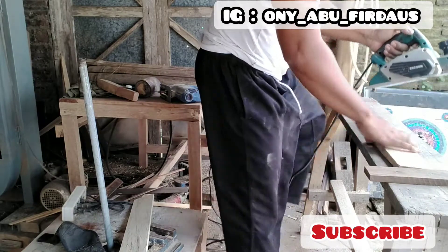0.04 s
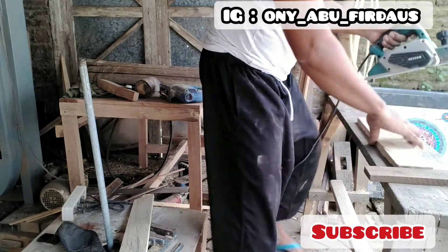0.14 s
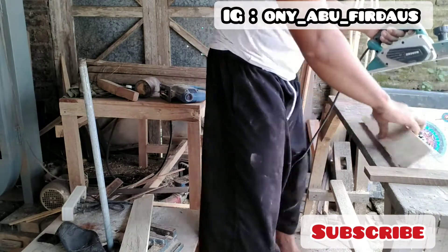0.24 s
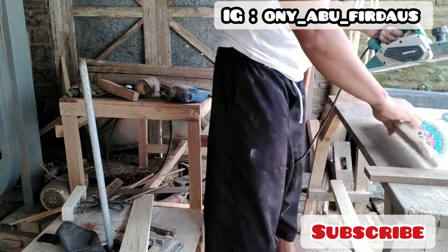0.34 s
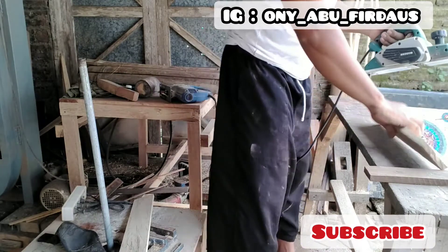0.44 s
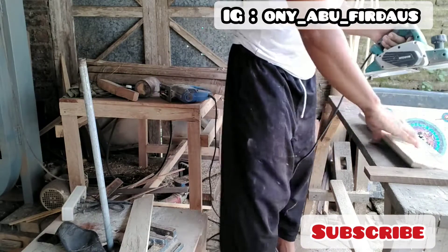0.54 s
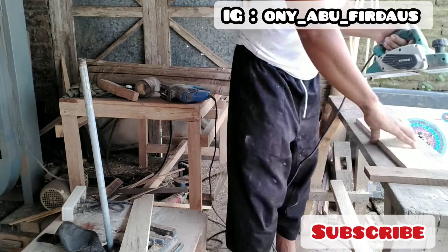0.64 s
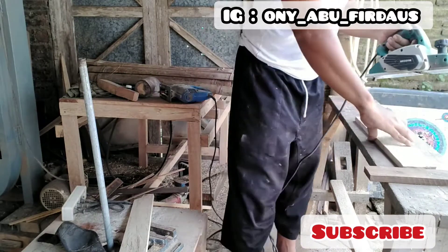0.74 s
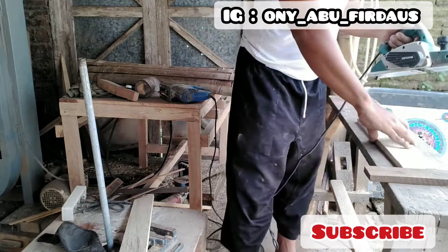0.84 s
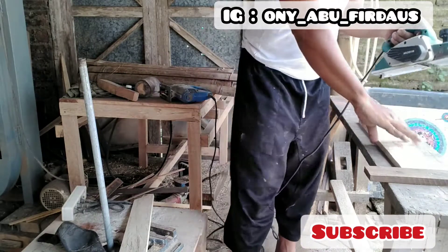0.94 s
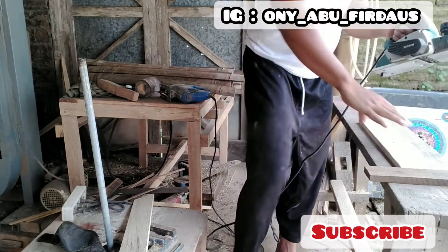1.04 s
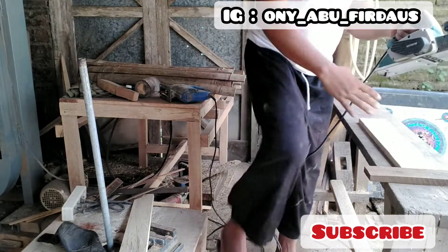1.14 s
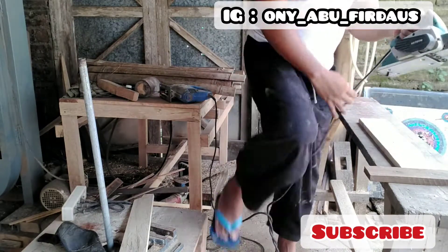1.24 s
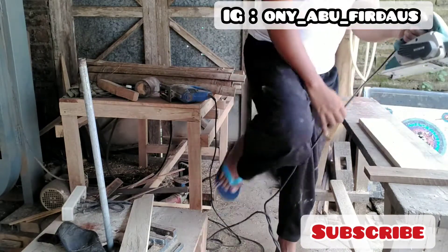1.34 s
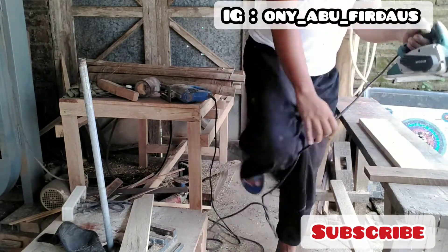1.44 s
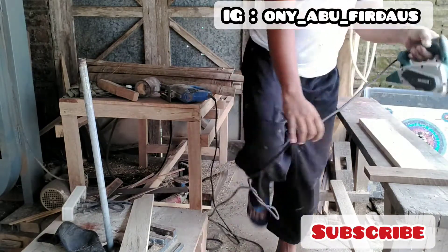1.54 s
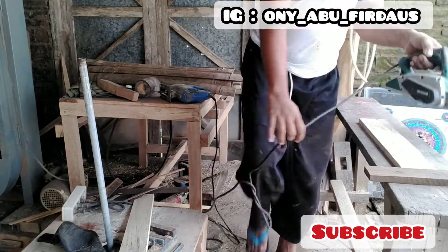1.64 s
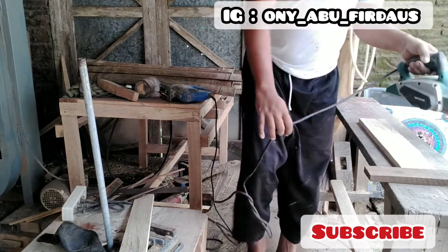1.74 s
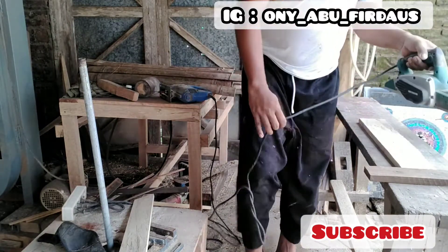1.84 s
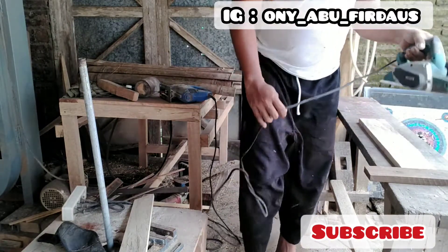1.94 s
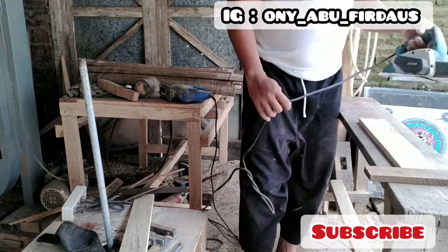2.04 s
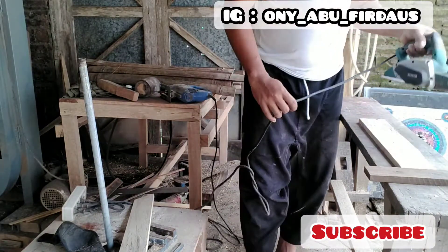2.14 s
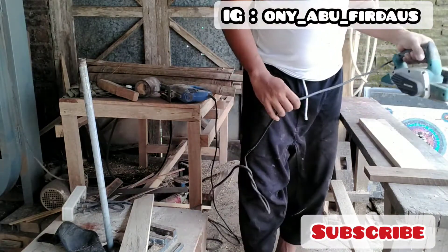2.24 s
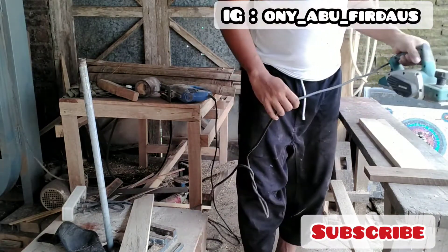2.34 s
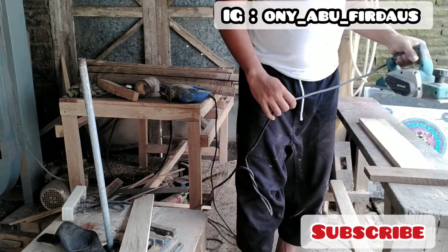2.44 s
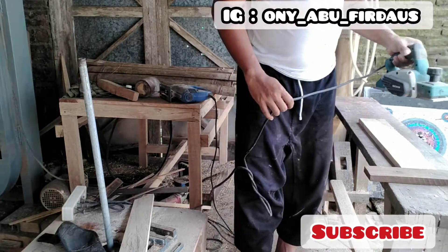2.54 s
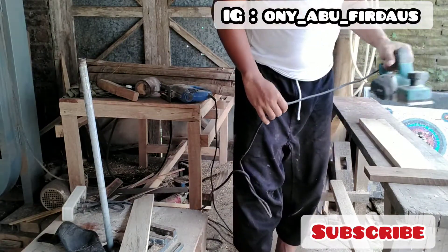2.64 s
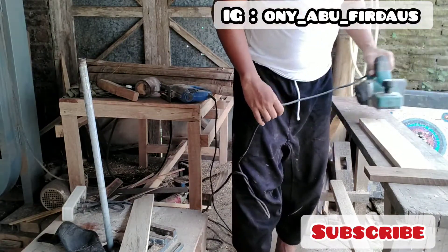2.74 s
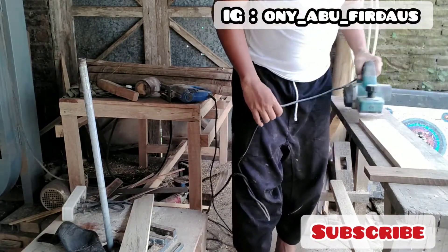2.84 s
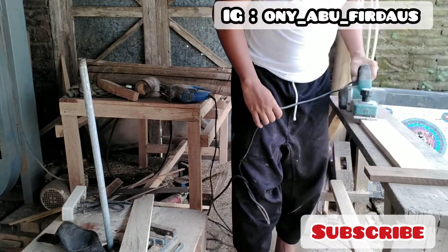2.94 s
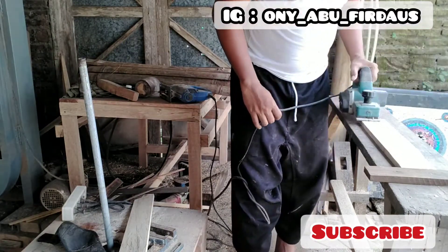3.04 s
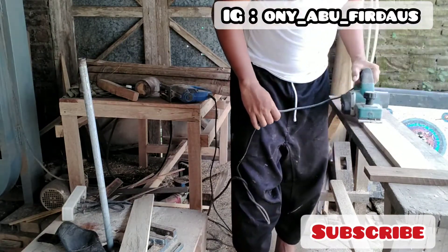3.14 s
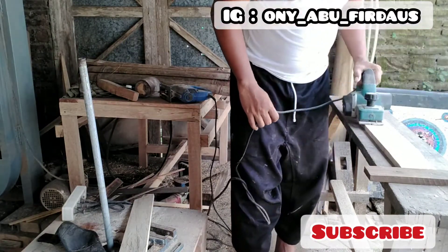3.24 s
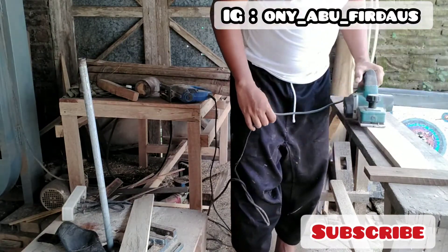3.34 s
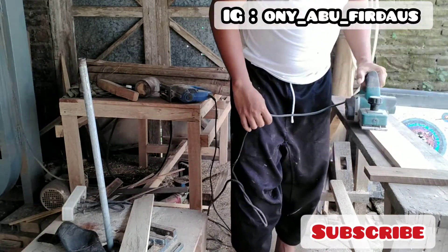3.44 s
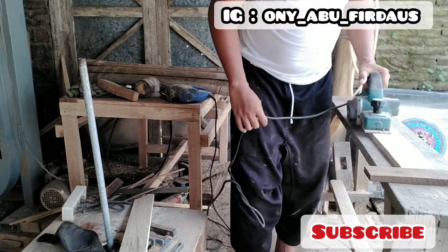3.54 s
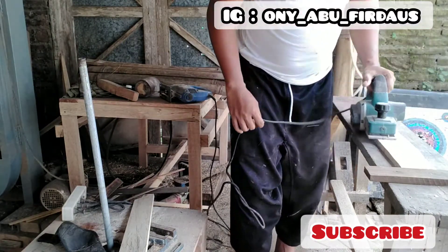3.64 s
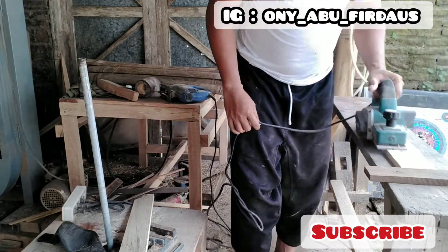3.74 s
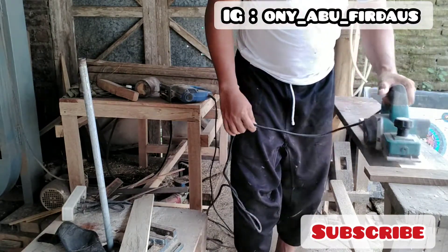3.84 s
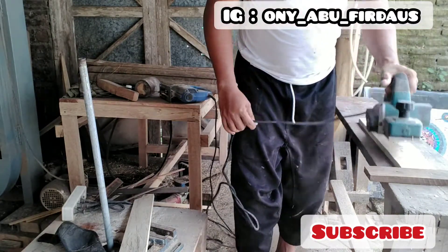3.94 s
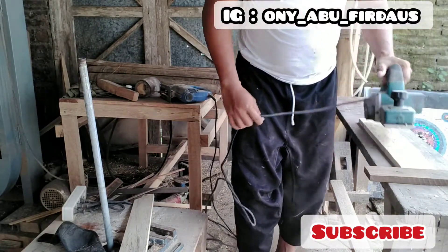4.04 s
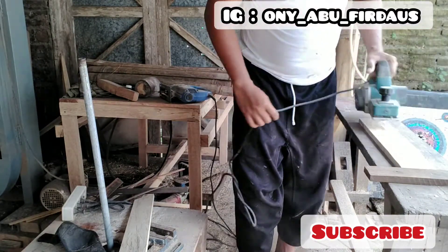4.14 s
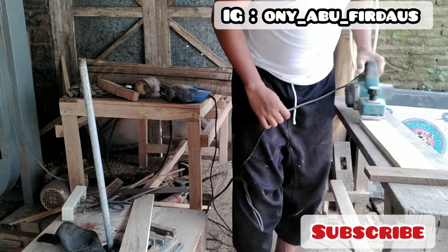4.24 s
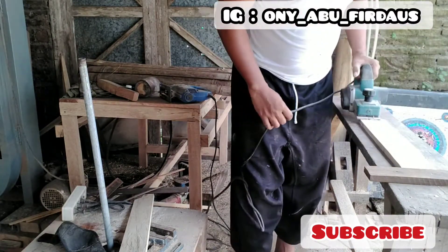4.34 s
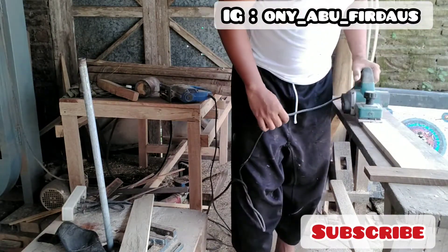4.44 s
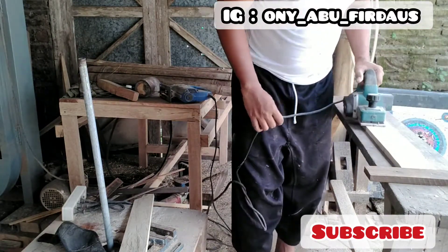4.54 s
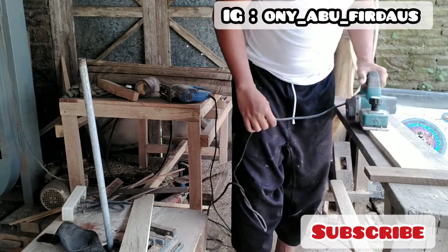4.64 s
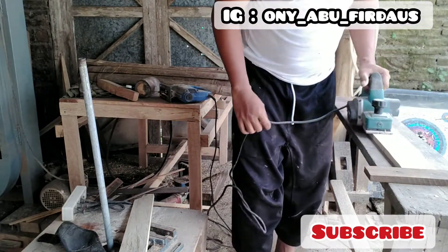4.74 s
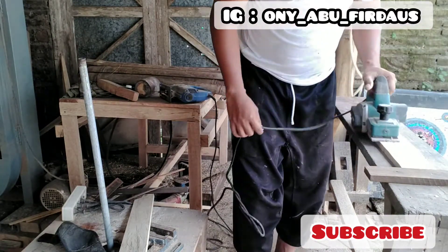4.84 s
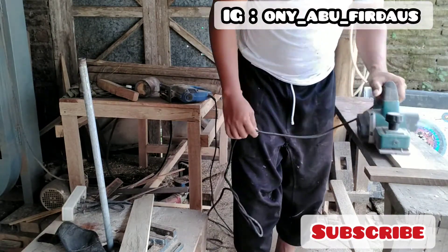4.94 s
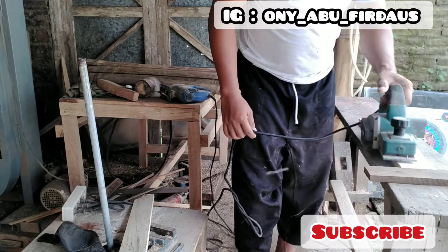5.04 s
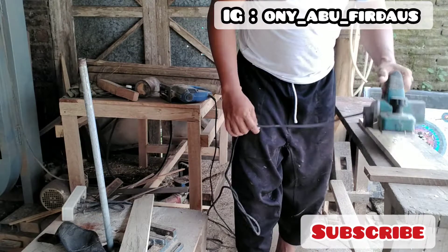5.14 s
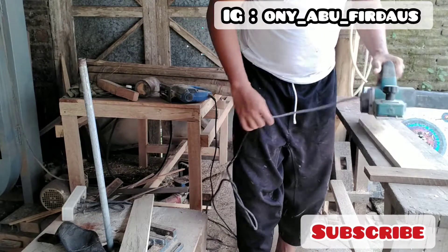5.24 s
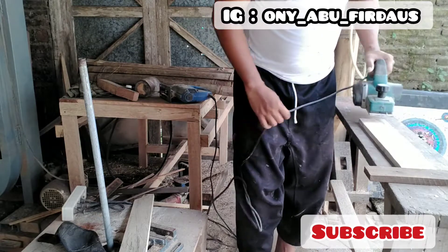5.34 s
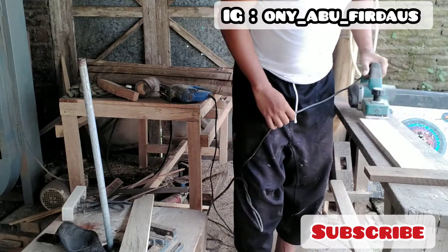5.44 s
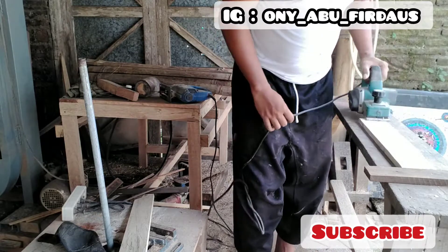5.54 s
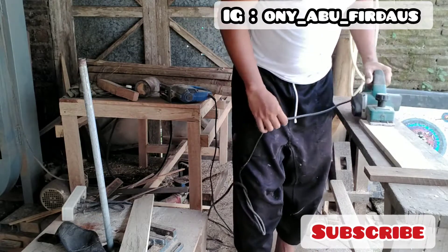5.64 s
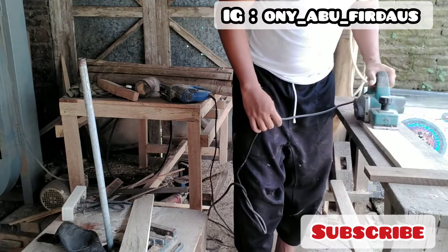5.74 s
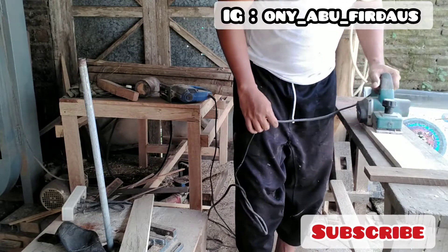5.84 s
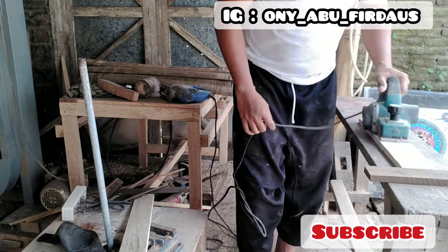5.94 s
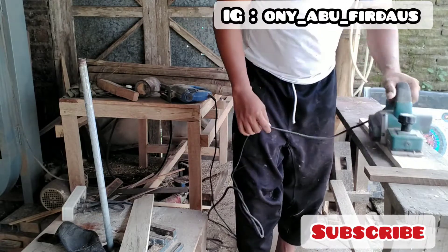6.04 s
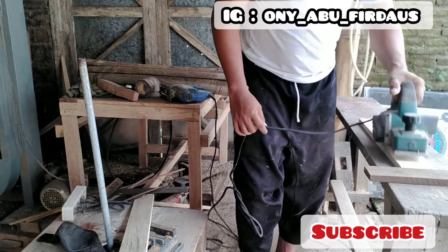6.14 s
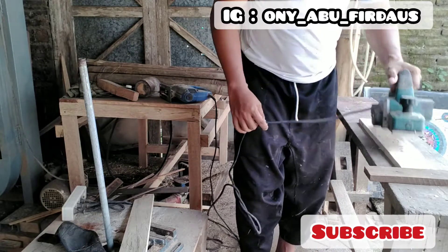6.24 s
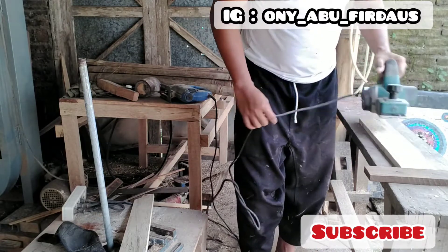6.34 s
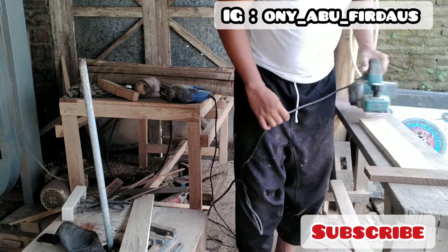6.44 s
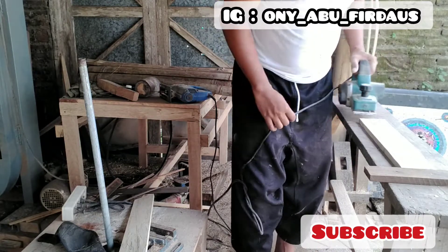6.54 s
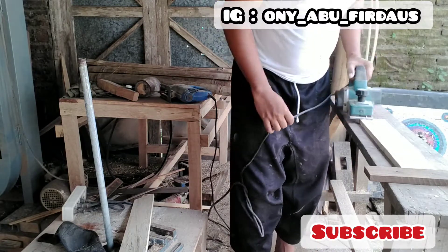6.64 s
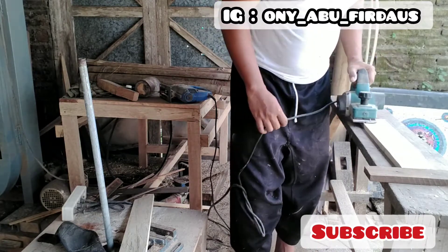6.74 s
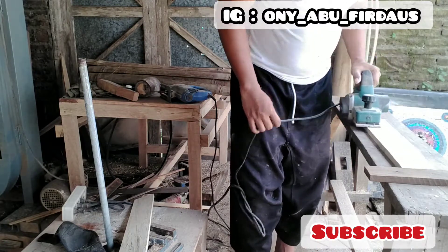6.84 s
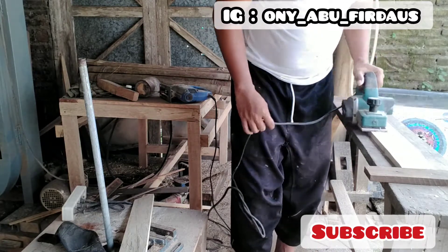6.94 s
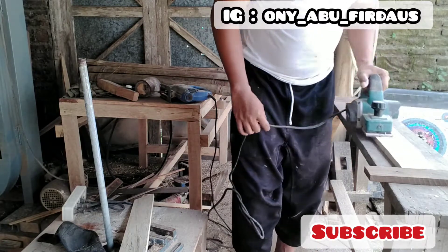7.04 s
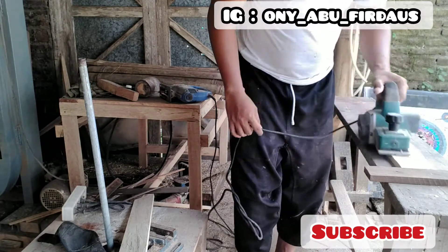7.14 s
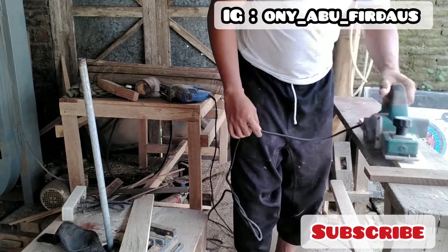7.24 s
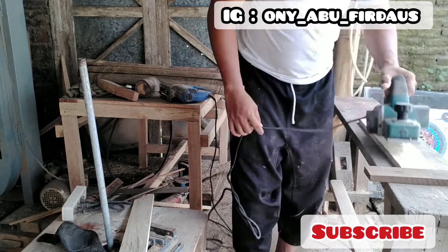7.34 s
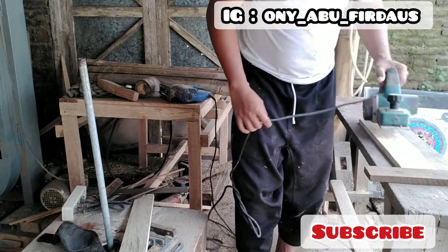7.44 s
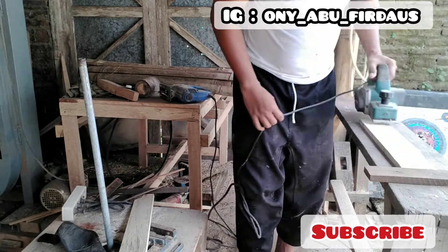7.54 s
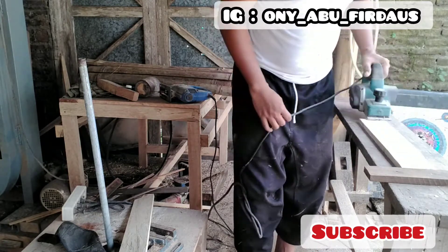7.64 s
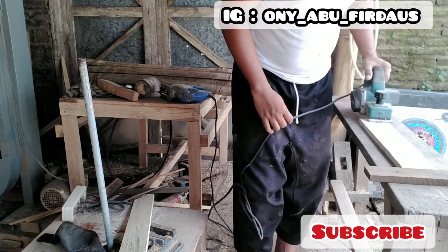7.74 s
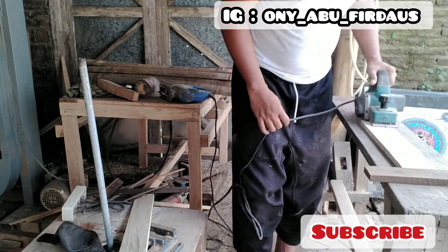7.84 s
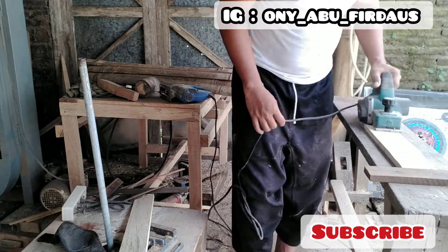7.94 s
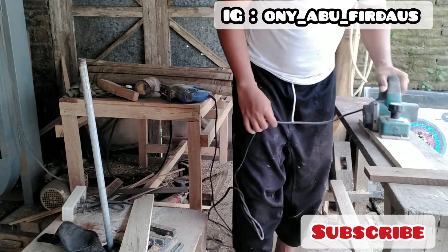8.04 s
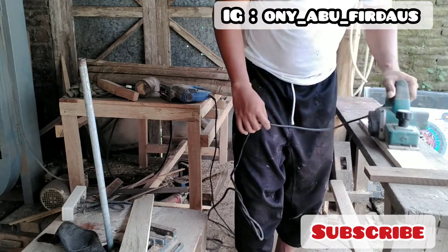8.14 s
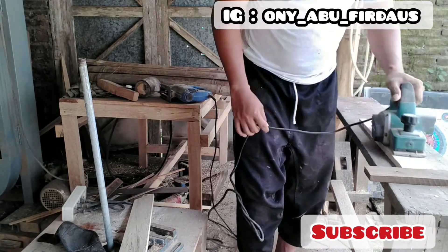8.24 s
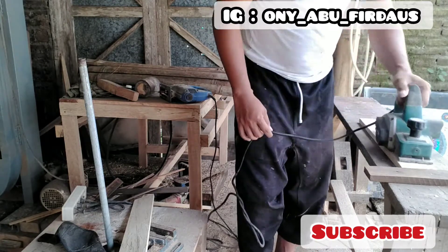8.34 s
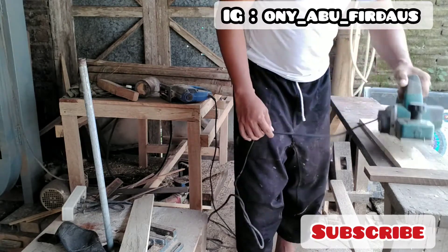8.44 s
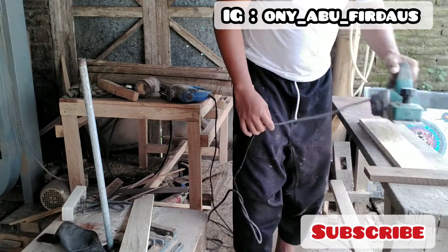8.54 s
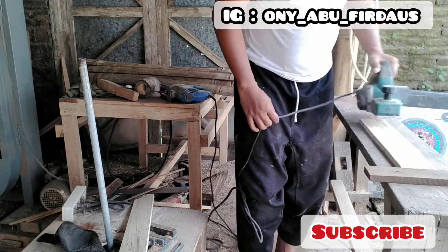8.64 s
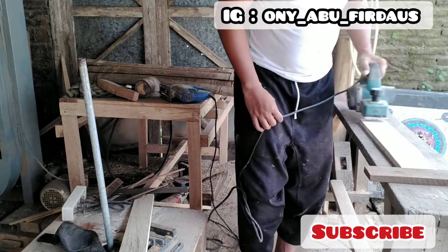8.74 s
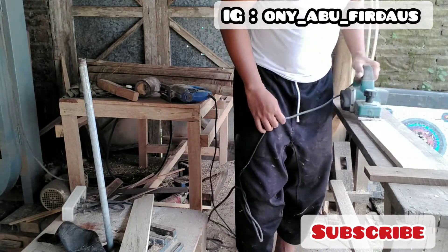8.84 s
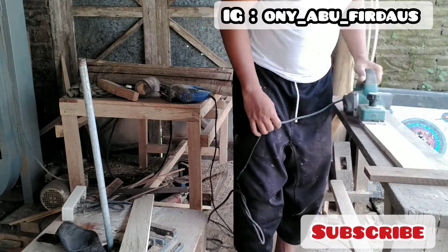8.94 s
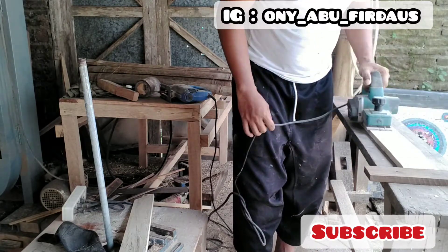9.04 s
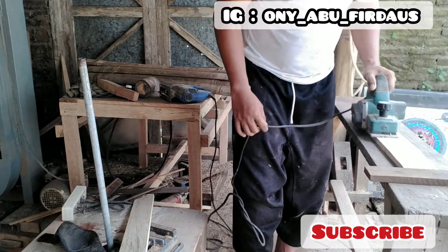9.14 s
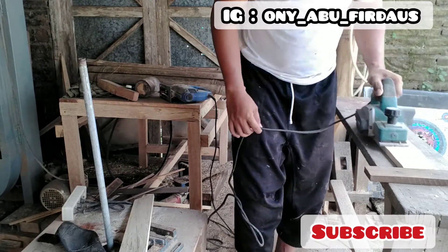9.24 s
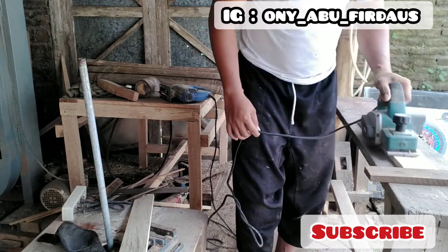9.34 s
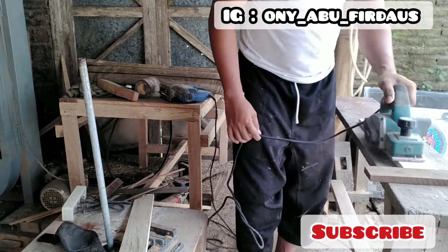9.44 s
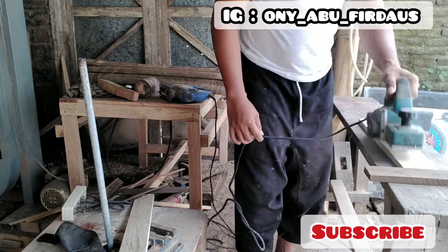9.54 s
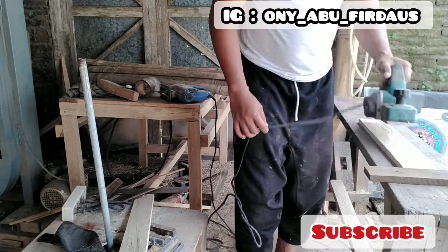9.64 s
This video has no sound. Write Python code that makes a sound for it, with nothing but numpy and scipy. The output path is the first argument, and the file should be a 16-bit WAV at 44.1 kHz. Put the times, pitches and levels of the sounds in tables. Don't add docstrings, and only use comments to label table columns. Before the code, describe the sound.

Wooden board knocks and slides on a bench, then an electric hand planer squeals, whines up and growls through six passes over the wood.

```python
import sys
import numpy as np
from scipy import signal
from scipy.fft import rfft, irfft, next_fast_len
from scipy.io import wavfile
from scipy.ndimage import uniform_filter1d, map_coordinates

SR = 44100
rng = np.random.default_rng(int(sys.argv[2]) if len(sys.argv) > 2 else 0)


def amplitude_ratio(level_db):
    exponent = np.asarray(level_db, float) / 20
    return 10 ** exponent


def wav_record(signal):
    frames = np.transpose(np.atleast_2d(signal))
    bounded = np.clip(frames, -1, 1)
    quanta = np.round(bounded * 32767).astype(np.int16)
    wavfile.write(sys.argv[1], SR, quanta)


N = 427769
TIME = np.arange(N) / SR

PULLEYS = 1.1185
FAN_VANES, ROTOR_SLOTS = 31, 12
ON_S, STEPS_HZ, GRIP_S = 2.305, 250, .03
CREEP_PCT, SLIP_LAG_S = .15, .035
START_SLIP_PCT, START_SLIP_S, START_SHAPE = 60, .105, 1.6
ATTACK_S, RELEASE_S, LINGER_S, SING_S = .008, .03, .029, .16
SHELL_DB, SHELL_GAP_DB, SHELL_GROWS = -23, -20, 2.8
CHUTE_DB, CHUTE_GAP_DB, CHUTE_GROWS = -23, -16, 1.3
FADE_DB = 1.4
WIND_PATCHY_DB = 1.2

# knife_rate_hz, speed_gain_hz_per_s
MOTOR_TORQUE = [(0, 1904), (250, 1150), (400, 469), (480, 251), (540, 131), (580, 75), (620, 37)]
# start_s, length_s, drum_drag_hz_per_s, belt_slip_pct
BITES = [(3.4, .119, 190, .7), (3.526, .101, 532, 1.6), (3.852, .06, 86, .3), (4.691, .153, 435, 1.9),
         (4.838, .036, 182, 4.8), (5.011, .057, 352, 1.9), (5.756, .19, 566, 4.6), (5.942, .032, 193, 4.7),
         (6.09, .074, 267, 1.5), (6.909, .102, 539, 3.1), (7.006, .139, 288, 3.2), (7.216, .054, 176, 1.4),
         (7.983, .122, 241, .7), (8.204, .093, 298, .9), (8.297, .133, 156, 1.4), (9.099, .104, 175, .7),
         (9.198, .274, 251, 1.8), (9.461, .09, 103, 1.4)]
# chop_db, board_rumble_db
BITE_LEVELS = [(-22.5, -37), (-22.5, -38.5), (-33, -58), (-24.5, -35.5), (-28, -44), (-27.5, -47),
               (-22, -34), (-27.5, -44), (-28, -45), (-22.5, -34), (-26.5, -38), (-27, -40), (-25, -44),
               (-25, -34.5), (-26, -41.5), (-26, -43), (-24.5, -38.5), (-30, -47)]
# knife_harmonic_3_db, knife_harmonic_4_db, knife_harmonic_5_db
BOARD_SINGING = [(-24.0, -26.9, -25.8), (-26.1, -24.5, -26.0), (-24.7, -31.3, -35.3), (-26.0, -22.8, -28.1),
                 (-27.7, -21.7, -24.9), (-24.6, -32.5, -31.0), (-41.1, -30.2, -30.4), (-37.2, -31.5, -30.3),
                 (-34.0, -32.1, -35.2), (-30.6, -27.5, -32.3), (-29.3, -28.5, -32.2), (-31.6, -29.2, -33.7),
                 (-25.1, -17.5, -23.0), (-23.7, -17.2, -24.7), (-23.3, -25.0, -31.7), (-23.8, -24.0, -18.6),
                 (-23.9, -29.5, -33.0), (-24.0, -31.1, -31.0)]
# order, level_db, change_in_wood_db
MOTOR_ORDERS = [(1, 1, -6), (2, 1, -4), (3, 0, -3), (4, 2, -6)]
# harmonic, change_in_wood_db
KNIFE_ORDERS = [(1, -3), (2, -2), (3, -12), (4, -2), (5, -3)]
# motor_order, drum_order, level_db
WEAK_LINES = [(0, 12, -40), (0, 14, -41), (0, 16, -45), (1.001, 1, -35.5), (1.993, -1, -39.5),
              (1.97, 1, -35), (3, -1, -35), (3.036, 1, -45), (3.97, 1, -37.5), (5, 0, -40), (6, 0, -72),
              (7.1, 0, -37), (24, 0, -66)]
# centre_hz, width_hz, level_db
SHELL_MODES = [(417, 24, 3.5), (486, 8, -1.3), (538, 29, -4.7), (806, 46, 2.3), (932, 69, 2.0),
               (997, 33, 3.6), (1069, 32, 2.3), (1457, 26, 5.3), (1506, 14, -0.8), (1605, 0, -0.1),
               (1956, 45, 5.8), (2057, 93, 1.0), (2136, 39, 0.0)]
# centre_hz, width_hz, level_db
CHUTE_MODES = [(420, 29, 3.2), (548, 19, -6.0), (590, 8, 2.1), (896, 74, 0.8), (1035, 60, -0.9),
               (1147, 62, -0.8), (1449, 96, 0.9), (1669, 78, -9.5), (1733, 47, -2.4), (2101, 62, -4.0),
               (2372, 112, -10.8), (2590, 77, -1.2), (2748, 30, -6.3)]
# freq_hz, level_db
WIND_SPECTRUM = [(40, -87), (180, -27), (400, -17), (600, -8), (1000, -5.5), (2200, -2.5), (3000, -10.5),
                 (4000, -16), (6000, -28), (7000, -28.5), (8700, -18.5), (10500, -28), (13000, -34),
                 (16000, -33)]
# freq_hz, level_db
CHOP_SPECTRUM = [(200, -7), (300, -4), (1000, -18), (2500, -1), (3400, -3.5), (4000, -5), (6090, -13.5),
                 (8950, -6), (10400, -20.5), (13000, -25), (16000, -27)]
# freq_hz, level_db
CHIP_SPECTRUM = [(500, -40), (2500, 4), (6000, -14.5), (8700, -16.5), (11000, -13), (16000, -44)]
# freq_hz, level_db
RUMBLE_SPECTRUM = [(30, -48), (70, -8), (120, 1.5), (300, 3.5), (600, 2.5), (1000, -57.5)]
# peak_s, level_db
THUMPS = [
    (2.325, -47),
    (3.417, -29),
    (4.759, -34),
    (5.777, -31),
    (6.949, -28),
    (9.239, -41),
]
# time_s, pitch_hz, level_db
SQUEAL = [
    (2.3, 8550, -73),
    (2.31, 8260, -21),
    (2.35, 6500, -21),
    (2.37, 5710, -19),
    (2.42, 5710, -20),
    (2.45, 6060, -22),
    (2.485, 6720, -25.5),
    (2.52, 6970, -37),
    (2.6, 7400, -77),
]
# centre_hz, width_hz, level_db
COVER_MODES = [(5740, 280, -3.5), (6710, 308, 5), (7840, 290, 4.5), (10500, 2400, -7)]
# start_s, peak_db, t60_s, knock_centre_hz
KNOCKS = [(.252, -46, .25, 3200), (0.502, -26, 0.081, 1180), (.521, -20, 0.18, 1170),
          (.535, -18, 0.21, 600), (.555, -22, 0.13, 500), (.585, -25.5, 0.41, 452), (.676, -32, 0.3, 600),
          (.712, -8, 0.18, 1390), (.745, -31, .2, 1300), (0.957, -17.5, 0.15, 1240),
          (.965, -16.5, 0.17, 1150), (.985, -36, 0.21, 1100), (2.09, -37, 0.18, 600),
          (2.312, -16.5, 0.16, 1280), (2.33, -18.5, 0.092, 2000)]
# freq_hz, level_db, t60_s
BOARD_MODES = [(570, -18.5, 0.23), (685, -1, 0.18), (840, -6.5, 0.4), (1490, 3, 0.23), (1580, -3.5, 0.85),
               (1820, -16, 0.25), (1860, 10, 0.12), (2160, -4, 0.18), (2390, -1.5, 0.12), (3413, -22, 0.35)]
# freq_hz, level_db
CLATTER_SPECTRUM = [(47, -51), (80, -10), (310, -10.5), (667, -9.5), (922, -6.5), (1470, -9.5), (3430, -18),
                    (5030, -34), (10000, -51), (13000, -71), (22000, -120)]
# peak_s, level_db, rise_s_per_20db, fall_s_per_20db
STROKES = [(.25, -54.5, .045, .13), (.384, -51, .17, .055), (.524, -54, .012, .11), (.72, -52, .07, .3),
           (.863, -45, .09, .065), (.958, -59, .02, .12), (1.15, -55, .045, .05), (1.98, -65, .05, .2),
           (2.14, -61.5, .4, .1)]
# freq_hz, level_db
GRIT_SPECTRUM = [(120, -40), (200, 1), (268, -17), (482, -10.5), (1370, -7.5), (1530, -10), (2420, -3),
                 (5420, -23.5), (8740, -16), (16000, -48)]
# centre_hz, width_hz, level_db
EDGE_MODES = [(2540, 97, -7), (3400, 180, -3), (4300, 250, -3)]
# freq_hz, level_db
AIR_SPECTRUM = [(18, -59), (30, -25), (145, -5), (161, -8), (684, -12), (740, -6.5), (962, -16.5),
                (1860, -18.5), (5310, -35), (8520, -35.5), (16000, -49)]
# freq_hz, level_db
FAR_HUM = [(339.1, -69), (737.5, -69.5)]


def planer():
    knife_hz, slip_pct = spin()
    motor_hz = knife_hz / PULLEYS * (1 + slip_pct / 100)
    drum_turns = np.cumsum(knife_hz / 2) / SR
    motor_turns = np.cumsum(motor_hz) / SR
    speed_db = 20 * np.log10(knife_hz / 570)
    chop_db, rumble_db = np.transpose(BITE_LEVELS)
    bite = in_wood(chop_db, RELEASE_S, LINGER_S)

    lines = orders(knife_hz, motor_hz, drum_turns, motor_turns, speed_db)
    lines += weak_lines(knife_hz, motor_hz, drum_turns, motor_turns, speed_db)
    lines += amplitude_ratio(-10) * shop(lines, t60_s=.25)
    running = lines + whistle(motor_turns, speed_db, bite) + wind(motor_turns, speed_db, bite)

    chatter_db = 1.7 * wobble(45)
    cut = amplitude_ratio(1.5 + chatter_db) * bite * cutting(drum_turns, slip_pct)
    return (TIME > ON_S) * running + cut + rumble(rumble_db)


def spin():
    t = np.arange(ON_S, N / SR + .01, 1 / STEPS_HZ)
    held = np.array([np.clip(np.minimum(t - s, s + length - t) / GRIP_S + .5, 0, 1)
                     for s, length, *_ in BITES])
    drag, load_slip_pct = np.transpose(BITES)[2:] @ held
    torque_at_hz, gain = np.transpose(MOTOR_TORQUE)
    hz = [20]
    for brake in drag[:-1]:
        hz.append(hz[-1] + (np.interp(hz[-1], torque_at_hz, gain) - brake) / STEPS_HZ)
    step = 1 / (STEPS_HZ * SLIP_LAG_S)
    slip_pct = CREEP_PCT + signal.lfilter([step], [1, step - 1], load_slip_pct)
    slip_pct += START_SLIP_PCT * np.exp(-((t - ON_S) / START_SLIP_S) ** START_SHAPE)
    return np.interp(TIME, t, hz), np.interp(TIME, t, slip_pct)


def in_wood(levels_db, release_s, linger_s):
    t, gain = TIME[::64], 0
    for (s, length, *_), db in zip(BITES, levels_db):
        attack = np.clip((t - s) / ATTACK_S + .5, 0, 1)
        release = np.exp(np.minimum(s + length + linger_s - t, 0) / release_s)
        gain = np.maximum(gain, amplitude_ratio(db) * attack * release)
    return np.interp(TIME, t, gain)


def housing_db(hz, modes, gap_db):
    grid_hz = np.arange(4000.)
    power = amplitude_ratio(gap_db) ** 2
    for c, w, db in modes:
        power = power + amplitude_ratio(db) ** 2 / (1 + (2 * (grid_hz - c) / max(w, 6)) ** 2)
    return np.interp(hz, grid_hz, 10 * np.log10(power))


def orders(knife_hz, motor_hz, drum_turns, motor_turns, speed_db):
    load = in_wood(np.zeros(len(BITES)), RELEASE_S, LINGER_S)
    lines = np.zeros(N)
    for k, db, wood_db in MOTOR_ORDERS:
        level_db = SHELL_DB + db + wood_db * load + SHELL_GROWS * speed_db
        level_db += FADE_DB / 2 * wobble(5) + housing_db(k * motor_hz, SHELL_MODES, SHELL_GAP_DB)
        lines += tone(k * motor_turns, level_db, shake_db=2.36)
    singing = [0, 0] + [in_wood(db + .5, SING_S, 0) for db in np.transpose(BOARD_SINGING)]
    for (k, wood_db), sing in zip(KNIFE_ORDERS, singing):
        free_db = CHUTE_DB + wood_db * load + CHUTE_GROWS * speed_db
        free_db += housing_db(k * knife_hz, CHUTE_MODES, CHUTE_GAP_DB)
        free = amplitude_ratio(free_db) * np.clip(knife_hz / 360, 0, 1) ** 4
        lines += (free + sing) * tone(2 * k * drum_turns, FADE_DB * wobble(5), shake_db=4.0)
    return lines


def weak_lines(knife_hz, motor_hz, drum_turns, motor_turns, speed_db):
    lines = np.zeros(N)
    for m, d, db in WEAK_LINES:
        m, d = round(m), round(d)
        chute_db = housing_db(m * motor_hz + d * knife_hz / 2, CHUTE_MODES, CHUTE_GAP_DB)
        level_db = db + 1 + .47 * chute_db + 2.6 * speed_db + 1.3 * wobble(5)
        lines += tone(m * motor_turns + d * drum_turns, level_db, shake_db=6.5)
    return lines


def whistle(motor_turns, speed_db, bite):
    vanes = tone(FAN_VANES * motor_turns, -53 - 100 * bite, shake_db=3)
    slot_hz = ROTOR_SLOTS * np.gradient(motor_turns) * SR
    tuned = 1 / (1 + ((slot_hz - 3250) / 330) ** 2)
    slot_db = -62 + 34 * tuned - .8 * speed_db * (1 - tuned)
    return vanes + tone(ROTOR_SLOTS * motor_turns, slot_db, shake_db=4)


def wind(motor_turns, speed_db, bite):
    gust = 1 + .081 * np.sin(2 * np.pi * motor_turns)
    level_db = -20.5 + 1.5 * speed_db + .097 * wobble(7.3) - 9.7 * bite
    return amplitude_ratio(level_db) * gust * noise(WIND_SPECTRUM, WIND_PATCHY_DB)


def chopping(drum_turns, slip_pct):
    count = np.arange(1, int(2 * drum_turns[-1]) - 2)
    luck = rng.standard_normal((len(count), 2))
    turn = count / 2 + .012 * (count % 2)
    turn = turn + .0007 * (1 + np.interp(count / 2, drum_turns, slip_pct) / 2) * luck[:, 0]
    turn = turn + .004 * np.interp(count / 2, drum_turns, wobble(90))
    at = SR * np.interp(turn, drum_turns, TIME)
    size = (1 + .3 * (-1.) ** count) * amplitude_ratio(.5 * luck[:, 1])
    taps = np.floor(at)[:, None] + np.arange(-7, 9)
    offset = taps - at[:, None]
    shape = np.sinc(offset) * np.cos(np.pi * offset / 16) ** 2
    return np.bincount(taps.astype(int).ravel(), (size[:, None] * shape).ravel(), N + 9)[:N]


def cutting(drum_turns, slip_pct):
    chop = coloured(chopping(drum_turns, slip_pct), CHOP_SPECTRUM)
    chop = unit(patchy(chop + amplitude_ratio(-1.5) * shop(chop, t60_s=.06), 3.5))
    per_knife = 1 + .61 * np.sin(4 * np.pi * drum_turns)
    spray = per_knife * noise(CHIP_SPECTRUM, WIND_PATCHY_DB)
    return amplitude_ratio(3.5) * chop + amplitude_ratio(-14 + 2.5 * slip_pct) * spray


def rumble(rumble_db):
    shake = in_wood(rumble_db, RELEASE_S, LINGER_S)
    for s, db in THUMPS:
        shake = shake + amplitude_ratio(peak_db(s, db, rise_s=.048, fall_s=.047))
    return shake * amplitude_ratio(2.2 * wobble(30)) * noise(RUMBLE_SPECTRUM, 5.5)


def squeal():
    time_s, pitch_hz, level_db = np.transpose(SQUEAL)
    hz = np.interp(TIME, time_s, pitch_hz)
    level_db = np.interp(TIME, time_s, level_db) + 2.9 * wobble(220)
    turns = np.cumsum(hz * (1 + .13 * np.tanh(wobble(1800)))) / SR
    rub = amplitude_ratio(level_db) * (np.sin(2 * np.pi * turns) + amplitude_ratio(-8.5) * np.sin(4 * np.pi * turns))

    def cover(f):
        return abs(sum(amplitude_ratio(db) * f * w / (c * c - f * f + 1j * f * w) for c, w, db in COVER_MODES))
    return amplitude_ratio(5) * filtered(rub * (TIME > time_s[0]), cover)


def board():
    return knocks() + sliding()


def knocks():
    out, t = np.zeros(N + SR), np.arange(SR // 2) / SR
    clatter = noise(CLATTER_SPECTRUM, .5)
    onset = 1 - np.exp(-t / .00038)
    for s, db, t60_s, knock_hz in KNOCKS:
        at = round(s * SR)
        ring = sum(amplitude_ratio(g + rng.normal(0, 1) - 60 * t / min(d, t60_s)) * np.sin(2 * np.pi * f * t)
                   for f, g, d in BOARD_MODES)
        burst = (amplitude_ratio(-8.5) * ring + clatter[at:at + len(t)] * amplitude_ratio(-60 * t / t60_s)) * onset
        band = signal.butter(2, [knock_hz / 5, knock_hz * 1.39], "band", fs=SR)
        out[at:at + len(t)] += amplitude_ratio(db - 8.5) * signal.lfilter(*band, burst)
    return out[:N]


def sliding():
    level_db = np.max([peak_db(*stroke) for stroke in STROKES], axis=0) + 8
    press = np.clip(amplitude_ratio(level_db) - amplitude_ratio(-70), 0, 1)

    def edge(f):
        return 1 + sum(amplitude_ratio(db) / (1 + (2 * (f - c) / w) ** 2) for c, w, db in EDGE_MODES)
    return press * amplitude_ratio(2.5 * wobble(150)) * unit(filtered(noise(GRIT_SPECTRUM, 1.5), edge))


def shop(x, t60_s):
    t = np.arange(SR // 3) / SR
    tail = rng.standard_normal(len(t)) * amplitude_ratio(-60 * t / t60_s) * (t > .001)
    return signal.fftconvolve(x, tail / np.linalg.norm(tail))[:N]


def yard():
    hum = sum(tone(hz * TIME, db, shake_db=1.0) for hz, db in FAR_HUM)
    return amplitude_ratio(-60 + 1.2 * wobble(3.8)) * noise(AIR_SPECTRUM, 1.5) + hum


def tone(turns, level_db, shake_db):
    phase = turns + rng.random() + .05 * wobble(40)
    return np.sqrt(2) * amplitude_ratio(level_db + shake_db * wobble(20)) * np.sin(2 * np.pi * phase)


def noise(points, patchy_db):
    return unit(patchy(coloured(rng.standard_normal(N), points), patchy_db))


def patchy(x, patchy_db):
    z = signal.stft(x, nperseg=512)[2]
    field = uniform_filter1d(uniform_filter1d(rng.standard_normal(z.shape), 4, 0), 12, 1)
    return signal.istft(z * amplitude_ratio(patchy_db * unit(field)), nperseg=512)[1][:N]


def coloured(x, points):
    f, db = np.transpose(points)
    return filtered(x, lambda hz: amplitude_ratio(np.interp(np.log(hz + 1), np.log(f), db)))


def filtered(x, response):
    m = next_fast_len(N + 8192)
    return irfft(rfft(x, m) * response(np.fft.rfftfreq(m, 1 / SR)), m)[:N]


def wobble(rate_hz):
    knots = rng.standard_normal(int(N * rate_hz / SR) + 4)
    return map_coordinates(knots, [TIME * rate_hz], order=2)


def peak_db(s, db, rise_s, fall_s):
    return db - 20 * np.maximum((s - TIME) / rise_s, (TIME - s) / fall_s)


def unit(x):
    return x / np.sqrt(np.mean(x ** 2) + 1e-20)


def levelled(x):
    knee_db, squeeze, follow_s = -15.5, .4, .06
    power = np.abs(uniform_filter1d(x ** 2, round(follow_s * SR)))
    level_db = 10 * np.log10(power + 1e-12)
    return x * amplitude_ratio(-squeeze * np.maximum(level_db - knee_db, 0))


def scene():
    near = squeal() + board()
    return (planer() + near + amplitude_ratio(-11.5) * shop(near, t60_s=.27) + yard())[None]


def low_pass(x):
    return signal.sosfilt(signal.butter(12, 17020, fs=SR, output="sos"), x)


def record(dry):
    x = levelled(dry[0])
    x = x / (1 + np.abs(x / .95) ** 4) ** .25
    x = filtered(x, lambda hz: (hz < 15760) / np.sqrt(1 + (50 / (hz + 1)) ** 6))
    return low_pass(x[None])


dry = scene()
out = record(dry)
wav_record(out)
```